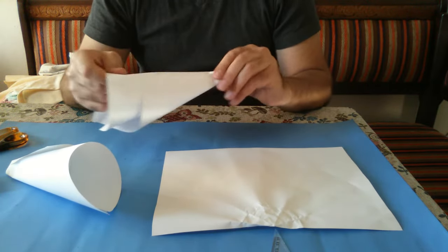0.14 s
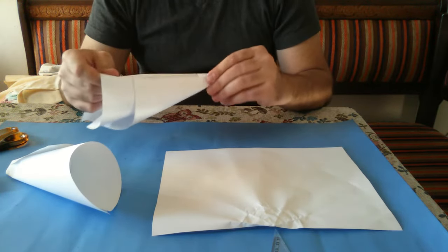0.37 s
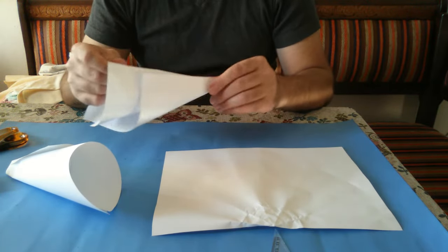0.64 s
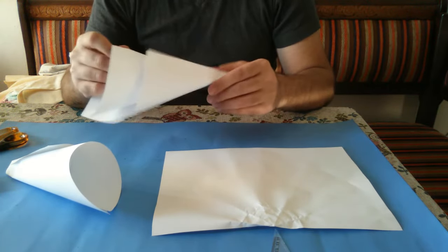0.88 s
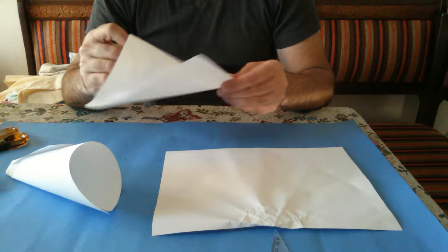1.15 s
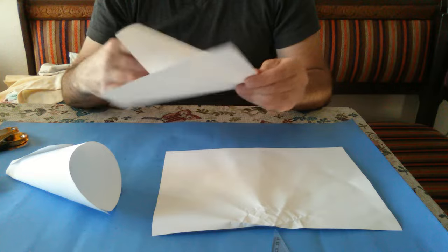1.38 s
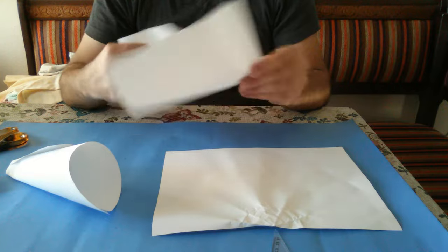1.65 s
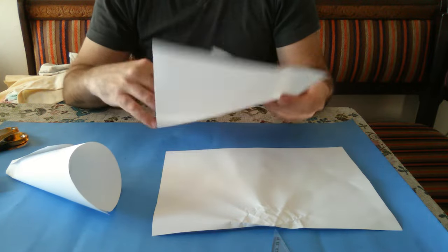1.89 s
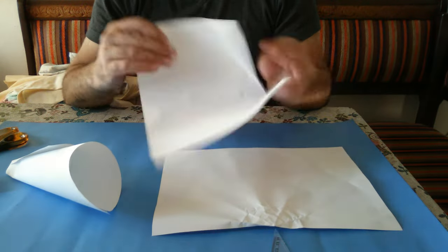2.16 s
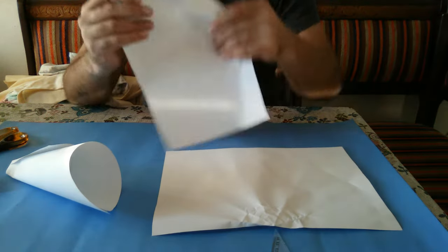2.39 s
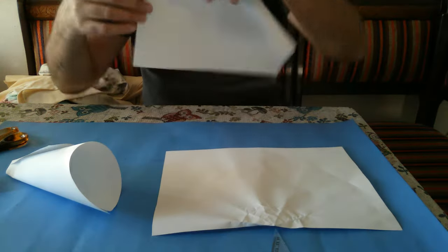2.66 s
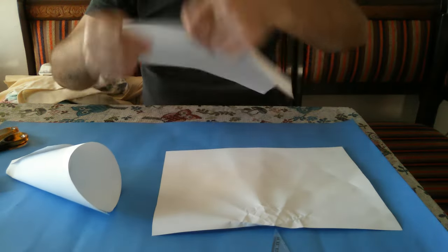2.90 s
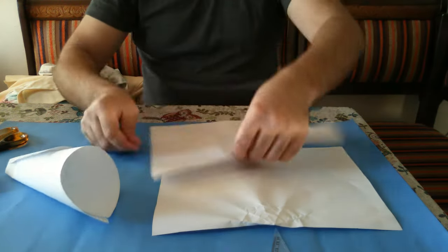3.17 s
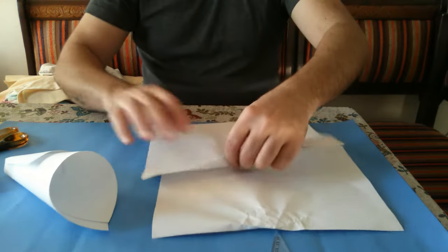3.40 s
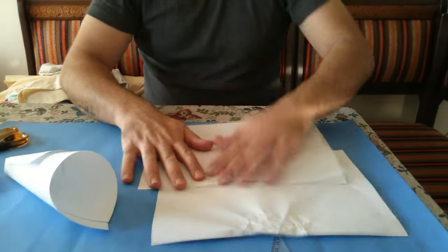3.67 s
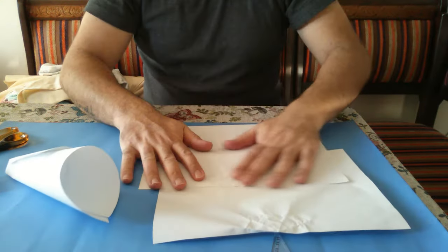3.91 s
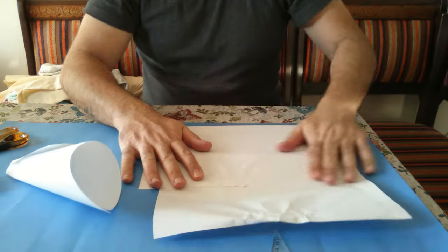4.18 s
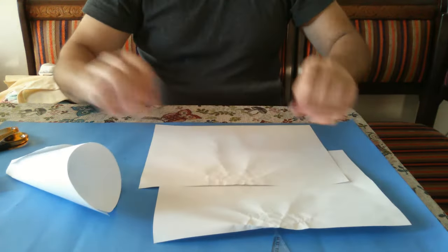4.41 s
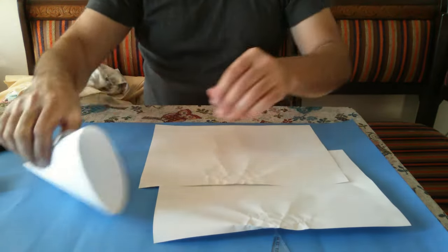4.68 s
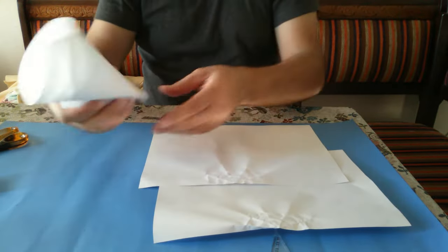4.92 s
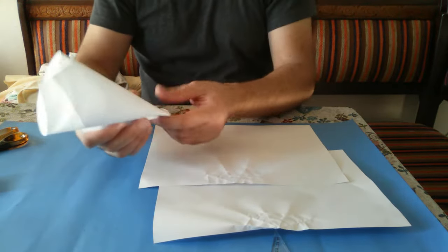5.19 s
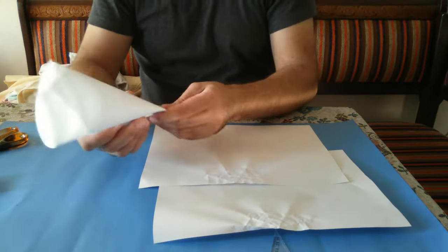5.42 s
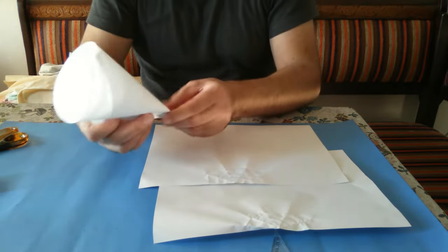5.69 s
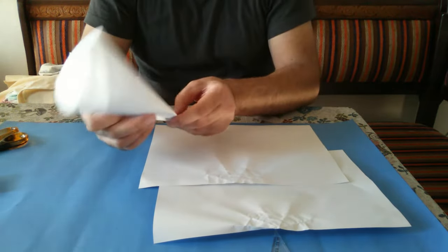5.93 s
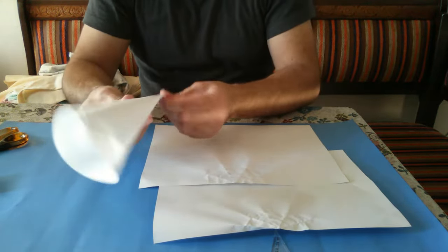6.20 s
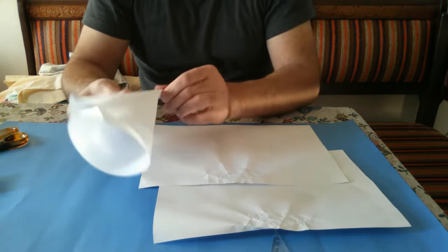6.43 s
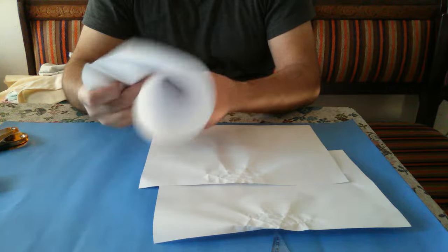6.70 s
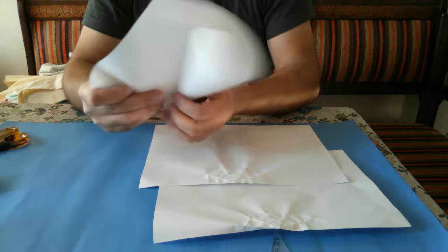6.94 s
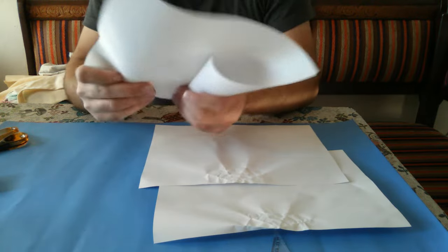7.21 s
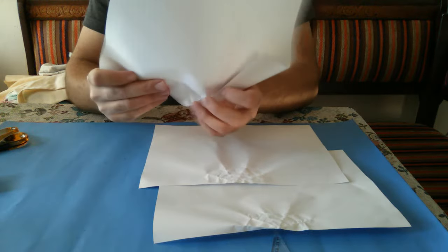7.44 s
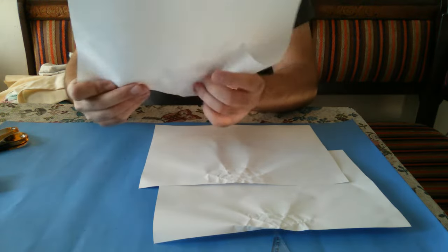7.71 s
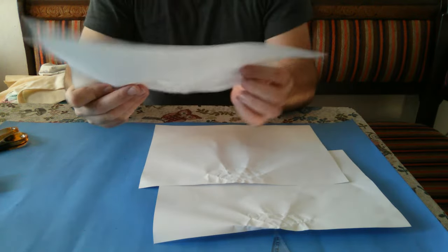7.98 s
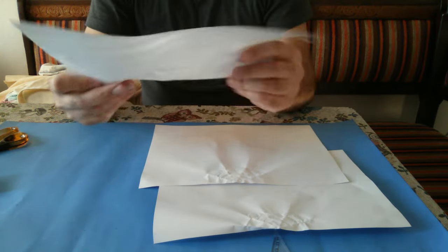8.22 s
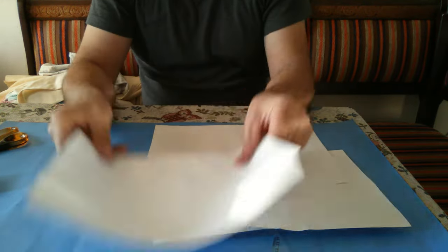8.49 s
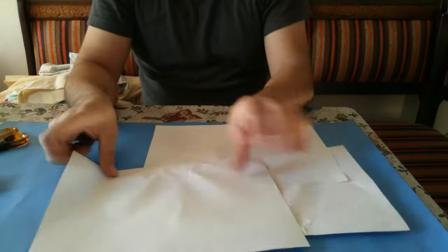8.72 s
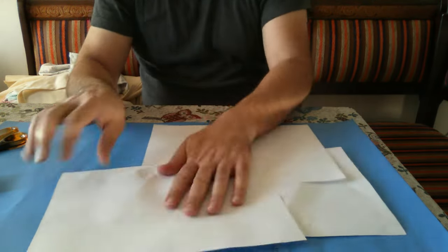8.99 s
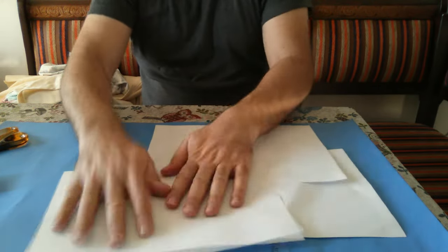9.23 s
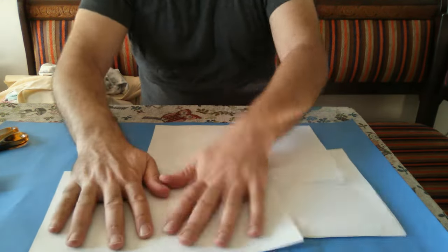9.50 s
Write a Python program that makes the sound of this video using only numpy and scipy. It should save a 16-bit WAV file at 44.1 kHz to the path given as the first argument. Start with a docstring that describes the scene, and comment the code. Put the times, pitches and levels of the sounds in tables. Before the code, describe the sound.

Stiff paper sheets rustle, crackle and snap as two rolled cones are opened and patted flat on a table in a small room.

```python
"""A faint paper rustle over a low hum comes first, then hands unroll two paper cones in a small room.
They lay the sheets on a table and pat them flat: creases snap as short bursts of noise, and
clicks ring small resonators as the sheet crackles and booms. Skin slides over it as shaped noise and
soft blows ring the table top. A low hum and the microphone's hiss, both shaped noise, lie underneath."""
import sys
import numpy as np
from scipy import signal
from scipy.fft import rfft, irfft
from scipy.io import wavfile

SR = 44100
rng = np.random.default_rng(int(sys.argv[2]) if len(sys.argv) > 2 else 0)


def convert_level_to_amplitude(level_db):
    """Map a level in decibels to its linear amplitude factor."""
    exponent = np.asarray(level_db, float) / 20
    return 10 ** exponent


def to_wav(s):
    """Save 16-bit WAV."""
    ch = np.atleast_2d(s).T  # columns
    pcm = np.round(np.clip(ch, -1, 1) * 32767)  # PCM
    wavfile.write(sys.argv[1], SR, pcm.astype(np.int16))


N = 423801  # length in samples

# Each time the sheet is bent, turned or pressed; levels are before the trims in rustle():
# start_s, rise_s, crackle_db, boom_db, slide_db
BENDS = [(0.0, 0.0017, -59, -54, -75.5), (.15, 0.17, -61, -53.5, -92), (.27, 0.052, -64, -74, -91),
         (.33, 0.13, -64, -56, -79), (.46, 0.047, -57.5, -50.5, -73), (.6, 0.05, -64, -56.5, -84),
         (.72, 0.04, -70, -70, -88), (.83, 0.031, -67, -58, -88), (.99, 0.021, -65, -78, -73),
         (1.03, 0.05, -73, -73, -77), (1.11, 0.05, -54.5, -52.5, -87), (1.15, 0.083, -50.5, -56, -85),
         (1.22, 0.12, -53, -52.5, -76), (1.338, 0.011, -35, -42.5, -73), (1.4, 0.096, -46.5, -43, -61.5),
         (1.6, 0.046, -50.5, -50, -79), (1.699, 0.013, -36.5, -36.5, -72), (1.73, 0.041, -42.5, -37.5, -66),
         (1.8, 0.073, -41.5, -39.5, -66.5), (1.87, 0.12, -54, -49.5, -71), (1.98, 0.078, -49, -49.5, -76),
         (2.121, 0.021, -43, -46, -63), (2.15, 0.057, -42, -47, -75), (2.23, 0.07, -56, -39, -94),
         (2.31, 0.069, -47, -45.5, -85), (2.471, .012, -42, -44, -66), (2.507, .012, -36, -35, -72),
         (2.53, 0.057, -39.5, -41, -66), (2.655, 0.022, -39.5, -40, -75), (2.74, 0.083, -51.5, -51.5, -76),
         (2.851, 0.011, -36, -35.5, -72), (2.88, 0.011, -41.5, -45.5, -76), (2.96, 0.048, -42, -42, -69),
         (3.035, .01, -41, -40, -69), (3.054, 0.017, -32, -35, -65), (3.133, 0.017, -34.5, -39, -68),
         (3.16, 0.047, -38, -42, -66), (3.25, 0.05, -46.5, -43.5, -73), (3.452, 0.018, -44.5, -51, -79),
         (3.52, 0.12, -54, -66, -73), (3.652, 0.027, -41.5, -39, -67), (3.822, 0.024, -29.5, -34, -62),
         (3.97, .1, -61, -55.5, -89), (4.15, 0.11, -70, -80, -84), (4.38, .06, -78, -66, -103),
         (4.54, 0.013, -70, -61, -96), (4.752, 0.031, -44.5, -36.5, -59), (4.83, 0.038, -59, -58, -66),
         (5.145, 0.043, -54, -52, -71), (5.2, 0.031, -65, -57, -80), (5.369, 0.04, -53, -51.5, -74),
         (5.43, 0.02, -58, -45, -77), (5.45, 0.04, -52, -46, -78), (5.52, 0.049, -61, -47, -85),
         (5.58, 0.016, -54, -50, -82), (5.65, 0.082, -57, -57, -77), (5.73, 0.011, -54, -65, -66.5),
         (5.815, .012, -56, -62, -76), (5.855, 0.0074, -59, -51, -72), (5.93, 0.084, -74, -78, -74.5),
         (6.13, 0.016, -57.5, -47, -84), (6.17, 0.059, -57.5, -54.5, -68),
         (6.322, 0.033, -37.5, -33.5, -53.5), (6.36, 0.03, -41, -38, -71), (6.42, 0.032, -38.5, -38.5, -60),
         (6.588, 0.011, -55, -43.5, -68), (6.616, 0.011, -47, -46, -61), (6.643, 0.026, -40.5, -47, -59.5),
         (6.74, .06, -51, -62, -73), (6.88, 0.027, -49, -58, -73), (6.907, 0.013, -40.5, -40.5, -64),
         (6.99, 0.04, -46.5, -50, -64.5), (7.06, 0.047, -38.5, -36, -59), (7.21, 0.03, -44.5, -44, -56),
         (7.29, 0.083, -49.5, -59, -63), (7.397, 0.016, -38, -40, -65), (7.43, 0.057, -37, -48.5, -62),
         (7.539, 0.013, -35.5, -59, -53.5), (7.56, 0.03, -33.5, -41, -69), (7.662, .015, -37.5, -44, -76),
         (7.68, 0.0095, -40.5, -46, -70), (7.768, 0.011, -40, -47.5, -72), (7.87, 0.077, -57, -80, -66),
         (7.985, 0.019, -43, -45, -64), (8.02, 0.055, -46, -55, -66), (8.09, 0.08, -51, -50.5, -81),
         (8.2, 0.045, -53, -60, -76), (8.324, 0.012, -40, -51.5, -56.5), (8.41, 0.043, -40, -37, -83),
         (8.46, 0.025, -36.5, -38.5, -60.5), (8.62, 0.073, -53, -68, -67), (8.71, 0.083, -53, -75, -65.5),
         (8.84, 0.063, -62, -82, -81), (8.96, 0.056, -73, -84, -91), (9.01, 0.055, -73, -78, -64),
         (9.048, 0.016, -46, -47, -70), (9.074, 0.016, -32.5, -42, -74), (9.346, 0.025, -61, -54, -87),
         (9.372, 0.023, -31, -35, -63), (9.42, 0.038, -59, -37.5, -72)]
# How fast each dies away after a bend: crackle, boom, slide (all dB per s)
FALL_DB_PER_S = [204, 237, 159]
# Trace of each left when the sheet is held still: crackle_db, boom_db, slide_db
REST_DB = [-80, -71.5, -88]
# Shape of the sheet, as the pitch of the panels that crackle most and of the hollow that the curl forms:
# time_s, panel_hz, hollow_hz
SHAPE = [(0, 2440, 420), (.32, 2280, 397), (.6, 2820, 650), (1.1, 2880, 500), (1.4, 2790, 960),
         (1.75, 2100, 694), (2.3, 1870, 565), (3.05, 2120, 475), (3.2, 2170, 860), (3.65, 2300, 375),
         (4.6, 2510, 420), (4.79, 1690, 895), (5.1, 1940, 406), (5.38, 2720, 434), (5.5, 1680, 435),
         (5.6, 2480, 460), (5.8, 3500, 574), (6.15, 1810, 680), (6.45, 1900, 560), (6.66, 3170, 890),
         (6.9, 2000, 560), (7.15, 2360, 910), (7.42, 1860, 540), (7.65, 2420, 716), (7.9, 2250, 525),
         (8.5, 1920, 780), (8.8, 3050, 480), (9.1, 2240, 845), (9.4, 2270, 520), (9.61, 2100, 450)]
# Tone colour of the crackle: pitch_hz, level_db (per Hz)
CRACKLE_COLOUR = [(410, -38.5), (700, -10), (1010, -2), (1810, 5), (2810, -1), (4210, 2.5), (4980, -23),
                  (6090, -45), (8200, -24), (12000, -37), (15600, -53), (22000, -120)]
# Tone colour of the boom: pitch_hz, level_db (per Hz)
BOOM_COLOUR = [(59, -65), (100, -10), (172, -3.5), (204, 2.5), (389, 1), (743, -3), (1010, 8),
               (1500, -18.5), (1950, -53.5), (3300, -120)]
# Tone colour of the sliding hiss: pitch_hz, level_db (per Hz)
SLIDE_COLOUR = [(3000, 22.5), (6000, 14.5), (9000, 5.5), (13000, 4.5), (16000, -1.5)]
# Rings of the air and wall of the rolled cone: pitch_hz, width_hz, level_db
CONE_RINGS = [(829, 55, -1.5), (994, 20, -5), (1753, 23, -6.5), (2500, 350, -20), (4110, 350, -0.5)]
# How much the rolled shape is heard, added to the ring levels: time_s, low_rings_db, top_ring_db
CURL = [(0, -5, 1), (.45, -0.5, -1), (1.1, 2.5, 11), (1.3, -8, -13), (2.2, -11, -24), (3.6, -8, -3.5),
        (4.5, -7, -7), (4.56, -7, 8), (4.7, -2, -11), (4.75, 5.5, -5), (4.95, 0, 2), (5.6, 1, -21),
        (5.85, -11, 6), (6.3, -13, -6), (6.6, -5, -10), (7.4, 3.5, -3), (8.6, 5, -8), (8.8, -13, 6),
        (9.05, -8, 0), (9.61, -4, -3)]
# Creases that pop; boom and bright edge are set against the crack, before the offsets in pop():
# time_s, peak_db, pitch_hz, boom_db, edge_db
SNAPS = [(0.4883, -48, 942, -3, -11), (0.8091, -42.5, 860, 10, -24), (1.0187, -50, 3770, -5, -8),
         (1.1182, -47, 3970, -16, -28), (1.146, -36, 2550, -21, -34), (1.187, -34, 2100, -6, -29),
         (1.3415, -24.5, 2350, -15, -16.5), (1.643, -37, 1170, -13, -32), (1.703, -40, 2600, -16, -18),
         (1.714, -31.5, 910, 7, -28), (1.7176, -32.5, 1500, -6, -22), (1.7337, -31.5, 2950, -16, -22),
         (1.8543, -24, 2070, -12, -26), (2.1266, -32.5, 1360, -3, -10), (2.1803, -30.5, 2860, -21, -43),
         (2.2709, -31, 865, -3, -45), (2.3362, -34.5, 2580, -5, -41), (2.3585, -31.5, 2230, -7, -45),
         (2.42, -37, 1270, -11, -40), (2.476, -34.5, 2270, -3, -17), (2.5112, -22.5, 1000, -9.5, -30),
         (2.57, -29, 1840, -13, -23), (2.6644, -28.5, 1900, -14, -33), (2.8523, -26, 1910, -10, -20),
         (2.886, -24.5, 1940, -11.5, -26), (2.9839, -30.5, 1920, -28, -8), (3.038, -24.5, 2020, -2, -29),
         (3.0548, -20, 2060, -13, -15.5), (3.1354, -21.5, 2020, -13, -16), (3.273, -33.5, 1790, -19, -43),
         (3.458, -31, 1200, -25, -21.5), (3.6726, -27, 810, -5, -20), (3.8327, -22.5, 1360, -5.5, -20),
         (3.8383, -19.5, 2860, -22, -12), (3.9496, -38, 1270, -7, -25), (4.5456, -51, 4420, -8, -11),
         (4.7553, -41.5, 905, 24, -6), (4.7783, -33.5, 845, -10, -20), (4.8697, -35, 850, -9, -26),
         (5.1652, -43, 814, 8, -10), (5.3839, -43, 805, -10, -36), (5.439, -37, 802, 1, -26),
         (5.4951, -34.5, 1260, -14, -26), (5.5832, -30, 3690, -14, -16.5), (5.7506, -35, 4420, -13.5, -24),
         (5.8177, -33.5, 3800, -18, -15.5), (5.868, -33, 3060, -9, -17), (5.876, -34.5, 3340, -5, -16),
         (6.1341, -41.5, 1780, -22, -53), (6.33, -40, 1010, -14, -3), (6.4124, -22.5, 1020, -1.5, -19),
         (6.4479, -25, 960, -31, -10.5), (6.6194, -32, 990, -15.5, -31), (6.647, -17.5, 3980, -30, -12),
         (6.8042, -41, 1900, -14, -33), (6.9122, -24, 1960, -12, -26), (6.9345, -30.5, 1930, -16, -25),
         (7.0766, -26.5, 1500, -13, -18), (7.1033, -18, 2550, -28, -21.5), (7.4023, -19.5, 1370, -5, -40),
         (7.42, -28, 1220, -11, -10.5), (7.456, -27, 1840, -9, -34), (7.5454, -14.5, 2050, -26, -23),
         (7.597, -23, 1230, -5.5, -10.5), (7.6694, -20, 2620, -9.5, -14), (7.6894, -22, 2100, -33, -20),
         (7.7721, -15.5, 1900, -19.5, -13.5), (7.9897, -23, 2180, -14, -25),
         (8.0333, -30.5, 2240, -21, -12.5), (8.076, -33.5, 1360, -31, -38), (8.1739, -36, 1900, -35, -46),
         (8.2876, -38.5, 1980, -28, -40), (8.335, -31, 850, -21, -10), (8.3928, -37, 2370, -12, -25),
         (8.4274, -23, 1650, -17, -22), (8.4569, -18.5, 1920, -16, -23), (8.6023, -38.5, 2300, -33, -31),
         (8.67, -43, 4200, -26, -17), (8.7688, -44, 3740, -27, -11), (9.0537, -35.5, 1430, -17, 4),
         (9.0857, -19.5, 2260, -37, -21), (9.3738, -30, 1330, -36, -13), (9.3906, -19, 1960, -34, -11)]
# Lesser creases that pop by chance: peak_above_crackle_db, spread_db, boom_db, edge_db
SMALL_SNAP = (9, 2.5, -8.5, -36)
# The wide end of a cone flaps: time_s, peak_db, pitch_hz, t60_s (time to fall by 60 dB)
FLAPS = [(1.149, -47.5, 269, 0.076), (5.156, -48, 264, 0.56), (5.43, -36.5, 383, 0.11),
         (5.501, -45.5, 344, 0.4), (6.326, -32.5, 414, 0.09), (6.354, -31, 220, 0.077),
         (6.389, -39, 229, 0.29)]
# Hands and sheet landing on the table: time_s, peak_db, contact_s, favoured_pitch_hz
KNOCKS = [(0.294, -44.5, 0.0029, 253), (1.078, -48.5, 0.0013, 128), (1.713, -44, 0.0044, 129),
          (2.509, -36, 0.0016, 307), (2.872, -45, 0.0047, 248), (3.652, -38, 0.0051, 137),
          (3.674, -23, 0.0011, 340), (3.83, -24, 0.0011, 145), (3.88, -28, 0.00094, 194),
          (4.776, -43, 0.0025, 264), (4.79, -55, 0.008, 60), (6.917, -47, 0.0019, 342),
          (7.6, -42, 0.0022, 144), (7.774, -45, 0.0029, 144), (8.461, -48, 0.0026, 175),
          (8.719, -49.5, 0.0045, 134), (9.06, -37, 0.0045, 113), (9.087, -35.5, 0.0026, 147),
          (9.368, -36, 0.0037, 118), (9.385, -28, 0.0021, 199), (9.431, -28, 0.0023, 197)]
# Ways in which the table top rings: pitch_hz, level_db, t60_s
TABLE_MODES = [(48, -7, 0.12), (73.3, -16.5, 0.14), (127, 0.5, 0.39), (155.7, 8, 0.1), (199, 3.5, 0.15),
               (232.6, 4.5, 0.41), (268, 10.5, 0.11), (326, 9, 0.078), (456, -2, 0.082)]
# Airy hiss of palms gliding over the paper and of the microphone: time_s, level_db
GLIDE = [(0.0, -81), (1.07, -84), (1.98, -80), (2.27, -75), (3.13, -76), (3.4, -85), (4.15, -70),
         (4.57, -89), (4.79, -103), (4.95, -76), (5.22, -84), (6.29, -87), (6.5, -79), (7.01, -76),
         (7.23, -86), (7.6, -70), (7.79, -76), (8.75, -76), (9.31, -86), (9.61, -81)]
# Tone colour of that airy hiss: pitch_hz, level_db (per Hz)
AIRY_COLOUR = [(2000, -23), (5000, 1), (8000, -6), (10000, -7.5), (13500, -2), (16000, -2)]
# Tone colour of the hum: pitch_hz, level_db (per Hz)
HUM_COLOUR = [(18, -86), (30, -33), (64, -4.5), (221, -4), (266, 2.5), (364, -7.5), (394, 0), (600, -9),
              (760, -7), (988, -28.5), (1630, -23.5), (2680, -26), (3060, -23.5), (3770, -30),
              (16000, -45.5)]
# Soft resonances in the hum, each passed through twice: pitch_hz, width_hz (of one pass), level_db
HUM_PEAKS = [(80, 120, -17), (131.6, 8.6, -6.5), (264, 29, 2.5), (429, 23.5, -3.5)]
# How long the room rings: pitch_hz, t60_s
ROOM = [(100, 0.49), (260, 0.35), (700, 0.24), (1840, 0.31), (4850, 0.24), (12000, 0.16)]


def bending():
    """Levels of crackle, boom and hiss in dB: every bend swells, then dies away; their powers add."""
    rise_from_db, step = -13, 32  # a bend swells from this far below its top; samples per level point
    t = np.arange(0, N + step, step) / SR
    fall = np.array(FALL_DB_PER_S)[:, None]
    power = convert_level_to_amplitude(2 * np.array(REST_DB))[:, None] * np.ones(len(t))
    for start, rise, *tops_db in BENDS:
        since_top = t - start - rise
        swell_db = -rise_from_db * since_top / max(rise, 0.003)
        shape_db = np.where(since_top < 0, swell_db, -fall * since_top)
        level_db = np.maximum(np.array(tops_db)[:, None] + shape_db, -150)
        power = power + (t >= start) * convert_level_to_amplitude(2 * level_db)
    return [np.interp(np.arange(N) / SR, t, 10 * np.log10(p)) for p in power]


def rustle(crackle_db, boom_db, slide_db):
    """The moving sheet: clicks ring its panels and hollow, the cone rings along, and skin hisses over it."""
    panel_hz, hollow_hz = in_time(SHAPE)
    fine = grains(4000, spread_db=3.0, clump_db=5.0, clump_per_s=30)
    panel_pitches = np.geomspace(800, 7000, num=16)
    crackle = panels(fine, CRACKLE_COLOUR, panel_pitches, panel_hz, lift_db=11.0, octaves=1.0, q=14.0)
    coarse = grains(1200, spread_db=3.0, clump_db=3.5, clump_per_s=14)
    hollow_pitches = np.geomspace(150, 1300, num=14)
    boom = panels(coarse, BOOM_COLOUR, hollow_pitches, hollow_hz, lift_db=9.0, octaves=0.66, q=7.9)
    cone = cone_rings(fine, crackle_db, boom_db)
    slide = colour(rng.standard_normal(N) * convert_level_to_amplitude(3.2 * drift(18)), SLIDE_COLOUR)
    crackle = convert_level_to_amplitude(crackle_db - 4.5) * soften(crackle, 5730)
    boom = convert_level_to_amplitude(boom_db - 4.5) * soften(boom, 1640)
    return crackle + boom + convert_level_to_amplitude(-9.0) * cone + convert_level_to_amplitude(slide_db + 9.0) * slide


def cone_rings(clicks, crackle_db, boom_db):
    """The clicks ring the rolled cone; its lowest rings follow the boom, the others the crackle."""
    low_db, top_db = in_time(CURL)
    cone = 0
    for hz, width, db in CONE_RINGS:
        moving_db = boom_db if hz < 1250 else crackle_db
        curl_db = low_db if hz < 3500 else top_db
        ring = resonance(resonance(clicks, hz, 2 * width), hz, 2 * width)
        cone = cone + convert_level_to_amplitude(db + moving_db + curl_db) * rms_one(ring)
    return cone


def grains(per_s, spread_db, clump_db, clump_per_s):
    """Tiny bucklings of the fibres: clicks of uneven size that come in clumps."""
    sizes = convert_level_to_amplitude(spread_db * np.minimum(rng.exponential(1, N), 5)) * rng.choice([-1, 1], N)
    chance = per_s * convert_level_to_amplitude(clump_db * drift(clump_per_s)) / SR
    return sizes * (rng.random(N) < chance) + 1e-18


def panels(clicks, spectrum, pitches, favoured_hz, lift_db, octaves, q):
    """Deals clicks to small resonators, driving those near the favoured pitch harder; keeps rms near 1."""
    out, power = 0, 0
    dealt = rng.integers(0, len(pitches), N)
    for k, hz in enumerate(pitches):
        nearness = np.exp(-(np.log2(hz / favoured_hz) / octaves) ** 2)
        gain = convert_level_to_amplitude(at_hz(spectrum, hz) + lift_db * nearness)
        ring = rms_one(resonance(clicks * (dealt == k) + 1e-18, hz, hz / q))
        out = out + gain * ring * np.sqrt(hz)  # the root turns level per Hz into level per resonator
        power = power + gain ** 2 * hz
    return out / np.sqrt(power)


def snaps(rows, t60=0.024):
    """The ear gets a few milliseconds of tearing noise; the walls, hearing all sides, get its mean colour."""
    length, echo_db = 2000, -6.0  # samples; level of what is sent to the walls
    near, far, t = np.zeros(N + length), np.zeros(N + length), np.arange(length) / SR
    envelope = np.minimum(t / 0.00066, 1) * convert_level_to_amplitude(-60 * t / t60)
    bursts = rng.standard_normal((len(rows), length)) * envelope
    for (s, peak_db, hz, boom_db, edge_db), burst in zip(rows, bursts):
        tear = pop(burst, hz, boom_db, edge_db)
        mean_colour = pop((t == 0) + 1e-18, hz, boom_db, edge_db)  # from a single click
        size = convert_level_to_amplitude(peak_db) / np.abs(tear).max()
        at = round(s * SR)
        near[at:at + length] += size * tear
        far[at:at + length] += size * convert_level_to_amplitude(echo_db) * mean_colour
    return near[:N], far[:N]


def pop(push, hz, boom_db, edge_db):
    """A push rings the panel's own pitch over a broad crack, with a boom below and an edge above; energy 1."""
    tick = push * convert_level_to_amplitude(-60 * np.arange(len(push)) / SR / 0.0082)  # the very top is over first
    ring = soften(resonance(push, hz, 0.11 * hz), max(4030, 1.31 * hz))
    crack = soften(band(push, 1080, 4200), 3190)
    boom = band(push, 347, 883)
    edge = band(band(push, 4130, 6980), 2290, 5600)
    top = band(tick, 6600, 16000)
    layers = [(ring, 0), (crack, -2.5), (boom, boom_db + 9.0), (edge, edge_db + 7.5), (top, edge_db - 13.5)]
    sound = sum(convert_level_to_amplitude(db) * rms_one(layer) for layer, db in layers)
    return sound / np.sqrt(np.sum(sound ** 2))


def small_snaps(crackle_db, count=30):
    """Lesser creases pop at chance moments, tied to the crackle's level and near the pitch of the panels."""
    over_db, spread_db, boom_db, edge_db = SMALL_SNAP
    panel_hz = in_time(SHAPE)[0]
    moments = rng.integers(0, N, count)
    chances = np.clip(rng.standard_normal((count, 2)), -2, 2)
    rows = []
    for at, (size, bend) in zip(moments, chances):
        peak_db = crackle_db[at] + over_db + spread_db * size
        hz = np.clip(panel_hz[at] * 2 ** (0.81 * bend), 800, 4500)
        rows.append((at / SR, peak_db, hz, boom_db, edge_db))
    return rows


def knocks():
    """A soft contact, half a sine long, strikes the table's modes, most those near the pitch of the spot."""
    out, t = np.zeros(N + SR), np.arange(SR // 2) / SR
    chance = 2 * rng.standard_normal((len(KNOCKS), len(TABLE_MODES)))  # dB
    for (s, peak_db, contact, spot_hz), chance_db in zip(KNOCKS, chance):
        ring = 0
        for (hz, db, t60), more_db in zip(TABLE_MODES, chance_db):
            mode_db = db + more_db - 7.2 * abs(np.log2(hz / spot_hz))  # weaker with every octave away
            ring = ring + convert_level_to_amplitude(mode_db - 60 * t / t60) * np.sin(2 * np.pi * hz * t)
        push = np.sin(np.pi * np.arange(0, contact, 1 / SR) / contact)
        blow = signal.fftconvolve(ring, push)[:len(t)]
        at = round(s * SR)
        out[at:at + len(t)] += convert_level_to_amplitude(peak_db) * blow / np.abs(blow).max()
    return out[:N]


def flaps():
    """A puff of dying noise in the slack rim's broad resonance."""
    out, t = np.zeros(N + SR), np.arange(SR // 2) / SR
    noises = rng.standard_normal((len(FLAPS), len(t)))
    for (s, peak_db, hz, t60), air in zip(FLAPS, noises):
        puff = air * np.minimum(t / 0.0022, 1) * convert_level_to_amplitude(-60 * t / t60)
        puff = resonance(resonance(puff, hz, 0.46 * hz), hz, 0.46 * hz)
        at = round(s * SR)
        out[at:at + len(t)] += convert_level_to_amplitude(peak_db) * puff / np.abs(puff).max()
    return out[:N]


def glide():
    """Gliding palms and the microphone make an even, bright hiss that swells and sinks slowly."""
    level_db = in_time(GLIDE)[0] + 0.8 * drift(6.0)
    return convert_level_to_amplitude(level_db) * colour(rng.standard_normal(N), AIRY_COLOUR)


def hum():
    """Steady noise that wavers, with a few soft resonances that waver on their own."""
    white = rng.standard_normal((len(HUM_PEAKS) + 1, N))
    tones = 0
    for (hz, width, db), noise in zip(HUM_PEAKS, white):
        tone = rms_one(resonance(resonance(noise, hz, width), hz, width))
        tones = tones + convert_level_to_amplitude(db + 2.5 * drift(2.1)) * tone
    level = convert_level_to_amplitude(-63 + 1.35 * drift(1.8))
    return level * (colour(white[-1], HUM_COLOUR) + convert_level_to_amplitude(-7.0) * tones)


def room(x, gap=0.009):
    """Echoes start after a short gap (s) as dense noise; every octave dies at its own rate."""
    t = np.arange(int(0.6 * SR)) / SR
    edges = 60 * 2.0 ** np.arange(9)  # octave borders in Hz
    white = rng.standard_normal(len(t))
    tail = 0
    for low, high in zip(edges, edges[1:]):
        t60 = at_hz(ROOM, np.sqrt(low * high))
        tail = tail + band(white, low, high) * convert_level_to_amplitude(-60 * t / t60)
    tail = tail * np.clip((t - gap) / 0.0017, 0, 1)
    return signal.fftconvolve(x, tail / np.sqrt(np.sum(tail ** 2)))[:N]


def rms_one(x):
    """Scales a sound to an average strength (rms) of 1."""
    return x / np.sqrt(np.mean(x ** 2) + 1e-20)


def in_time(rows):
    """Draws straight lines between a table's rows, one curve for each column after the time."""
    s, *columns = np.transpose(rows)
    return [np.interp(np.arange(N) / SR, s, c) for c in columns]


def at_hz(points, hz):
    """Reads a table at any pitch, on a logarithmic pitch scale."""
    table_hz, values = np.transpose(points)
    return np.interp(np.log(hz), np.log(table_hz), values)


def colour(x, spectrum):
    """Shapes the spectrum with a minimum-phase filter, so nothing sounds early; rms 1."""
    size = 4096
    hz = np.arange(size // 2 + 1) * SR / size + 1
    cepstrum = irfft(np.log(convert_level_to_amplitude(at_hz(spectrum, hz))))
    cepstrum[1:size // 2] *= 2  # folding the second half onto the first gives minimum phase
    cepstrum[size // 2 + 1:] = 0
    response = irfft(np.exp(rfft(cepstrum)))
    return rms_one(signal.fftconvolve(x, response)[:N])


def drift(rate):
    """Slow random wandering of rms 1, from noise smoothed twice; rate in Hz."""
    r = np.exp(-2 * np.pi * rate / SR)
    noise = rng.standard_normal(N + SR)
    return rms_one(signal.lfilter([1], [1, -2 * r, r * r], noise)[SR:])  # the first second settles


def resonance(x, hz, width):
    """Rings at one pitch; the narrower the width in Hz, the longer the ring."""
    r = np.exp(-np.pi * width / SR)
    gain = (1 - r * r) / 2
    return signal.lfilter([gain, 0, -gain], [1, -2 * r * np.cos(2 * np.pi * hz / SR), r * r], x)


def band(x, low_hz, high_hz):
    """Keeps mainly what lies between two pitches."""
    return signal.sosfilt(signal.butter(2, [low_hz, high_hz], "band", fs=SR, output="sos"), x)


def soften(x, cut_hz):
    """Takes away the treble above a pitch."""
    return signal.sosfilt(signal.butter(4, cut_hz, fs=SR, output="sos"), x)


def scene():
    """Adds the paper, the table, their echoes and the background."""
    crackle_db, boom_db, slide_db = bending()
    near, far = snaps(SNAPS + small_snaps(crackle_db))
    thuds = knocks() + flaps()
    moving = rustle(crackle_db, boom_db, slide_db)
    to_walls = far + convert_level_to_amplitude(-4.0) * thuds + convert_level_to_amplitude(-7.5) * moving
    mix = near + thuds + moving + room(to_walls) + hum() + glide()
    return mix[None]  # one channel


def roll_off(x):
    """The treble ends steeply here."""
    return signal.sosfilt(signal.butter(12, 15810, fs=SR, output="sos"), x)


def record(dry):
    """The microphone drops the deepest bass, below about 62 Hz."""
    mix = signal.sosfilt(signal.butter(3, 62, "high", fs=SR, output="sos"), dry)
    return roll_off(mix)


dry = scene()
out = record(dry)
to_wav(out)
```